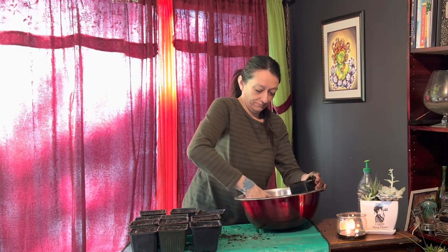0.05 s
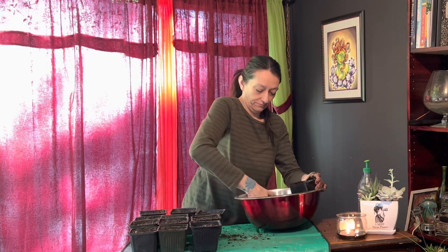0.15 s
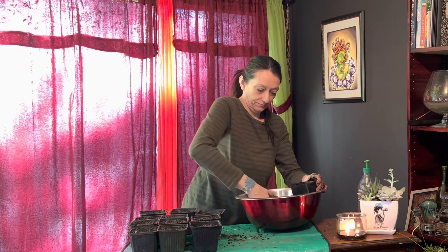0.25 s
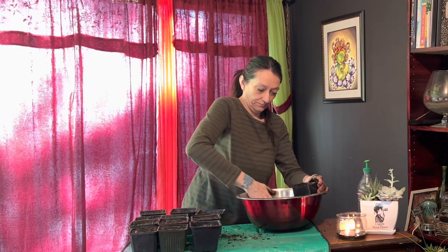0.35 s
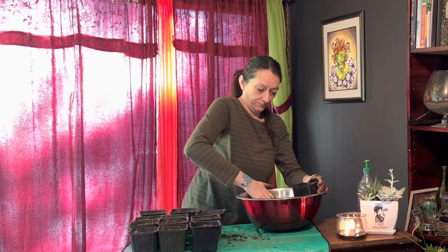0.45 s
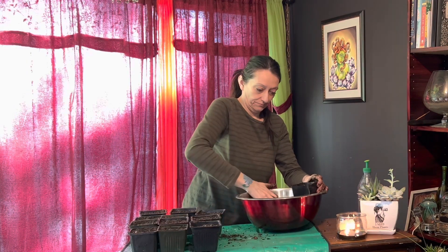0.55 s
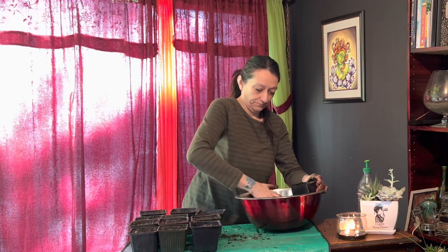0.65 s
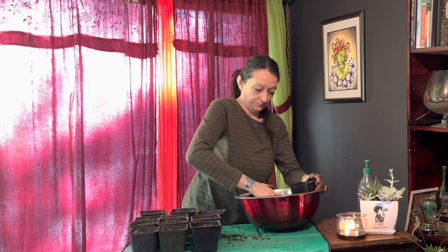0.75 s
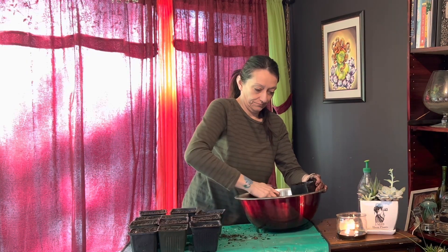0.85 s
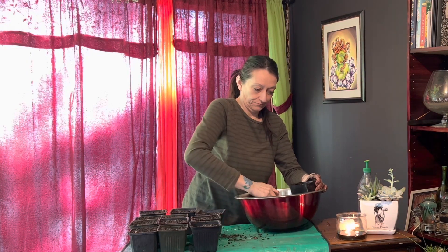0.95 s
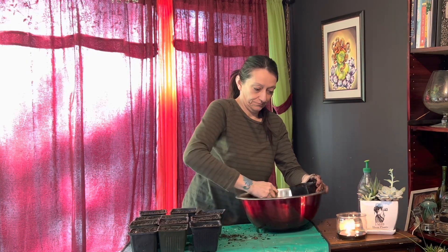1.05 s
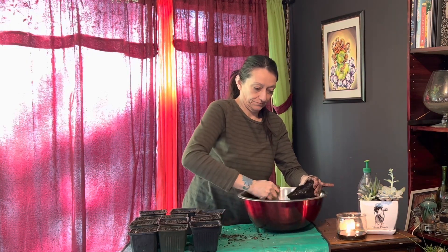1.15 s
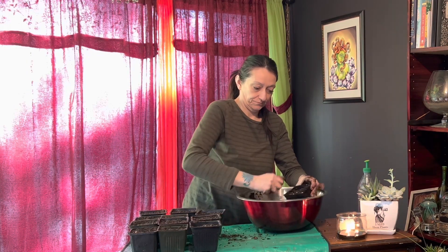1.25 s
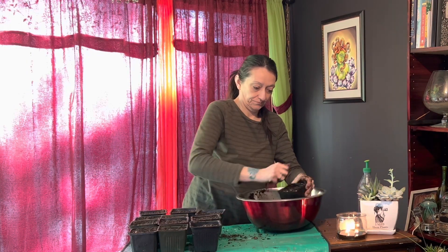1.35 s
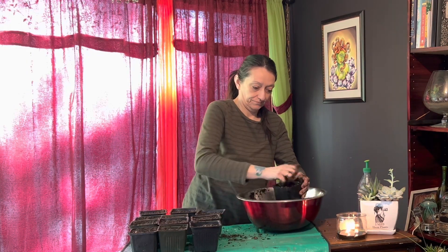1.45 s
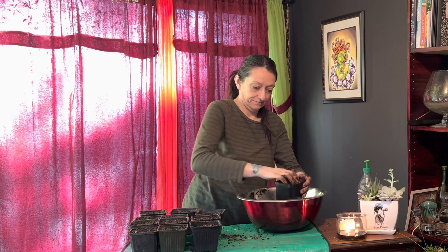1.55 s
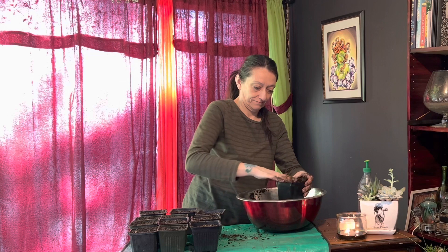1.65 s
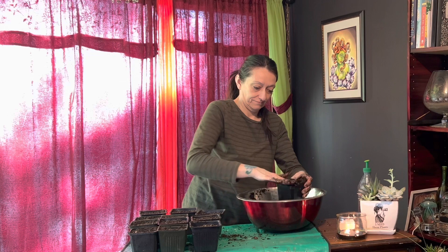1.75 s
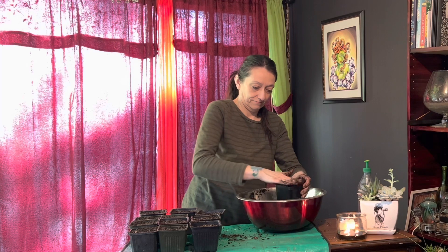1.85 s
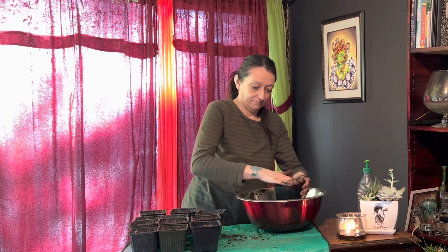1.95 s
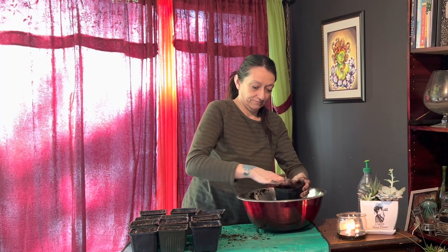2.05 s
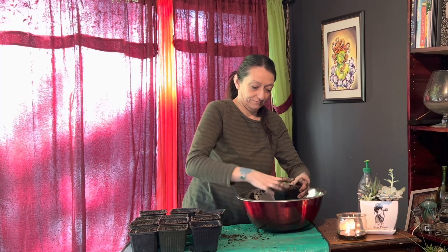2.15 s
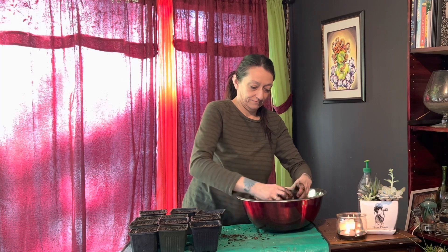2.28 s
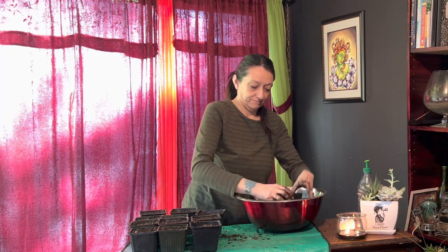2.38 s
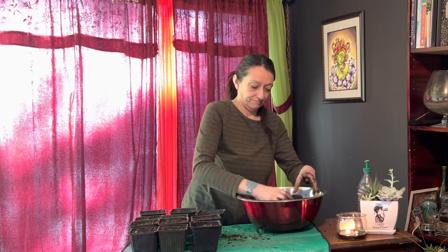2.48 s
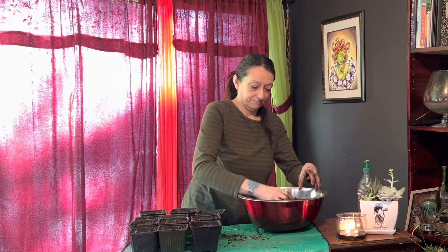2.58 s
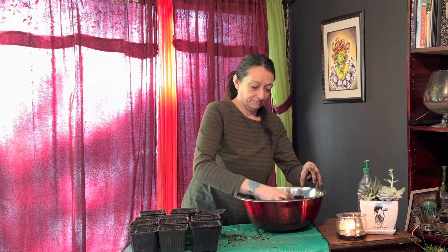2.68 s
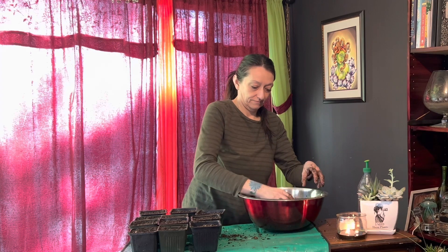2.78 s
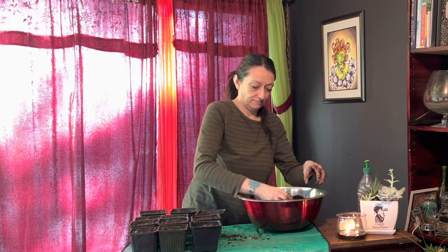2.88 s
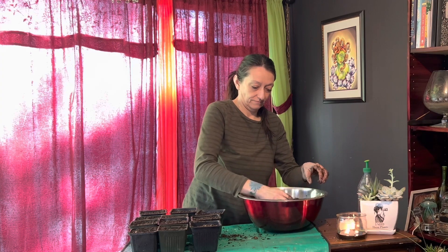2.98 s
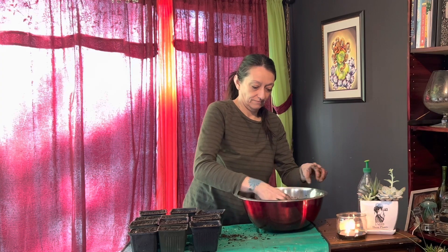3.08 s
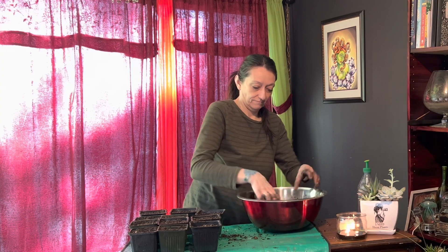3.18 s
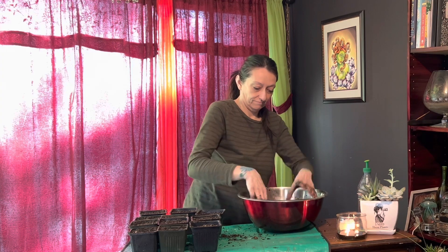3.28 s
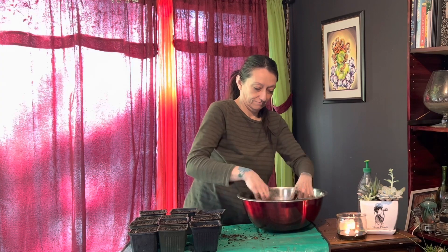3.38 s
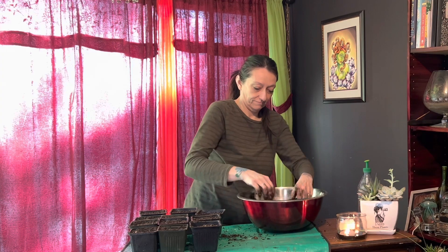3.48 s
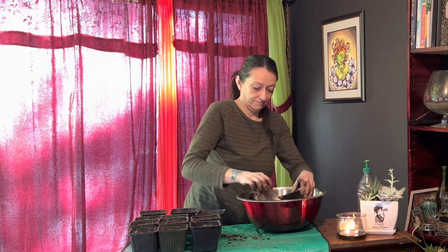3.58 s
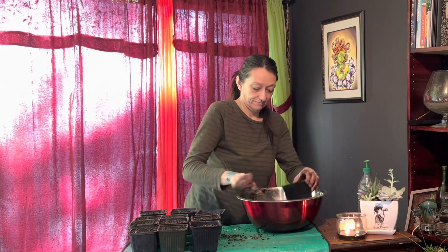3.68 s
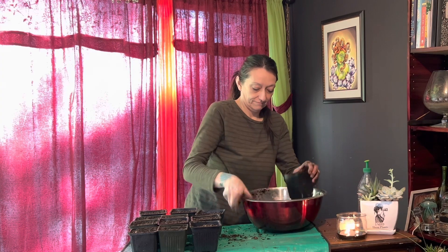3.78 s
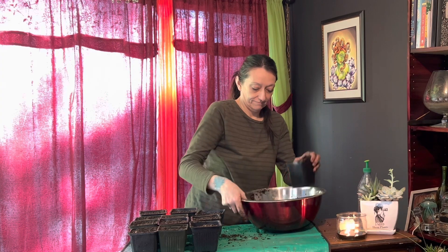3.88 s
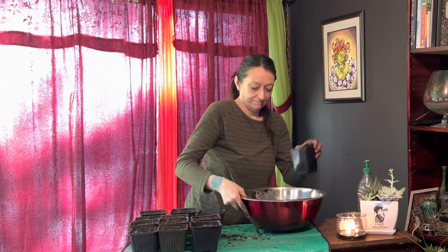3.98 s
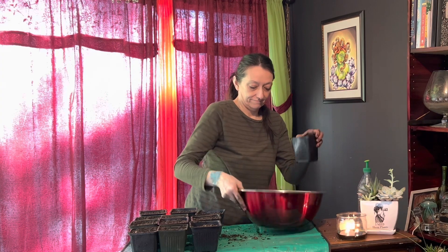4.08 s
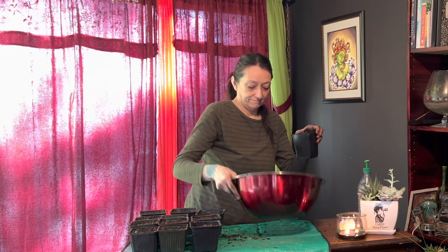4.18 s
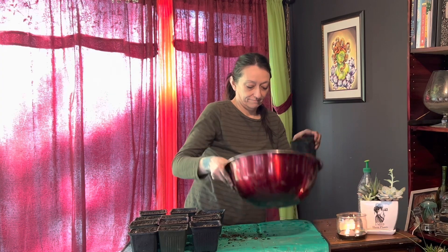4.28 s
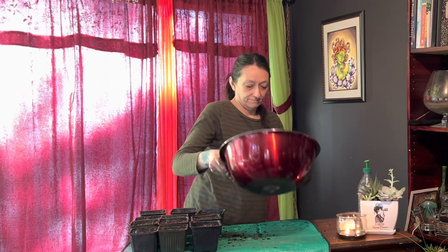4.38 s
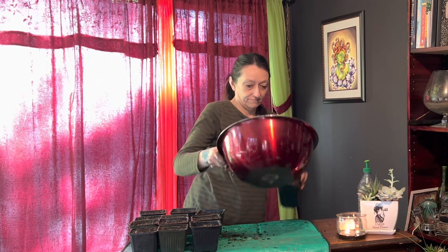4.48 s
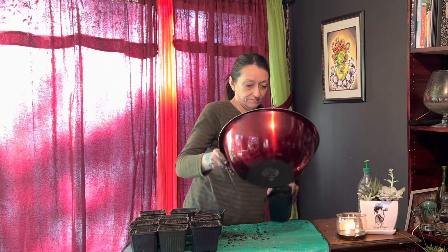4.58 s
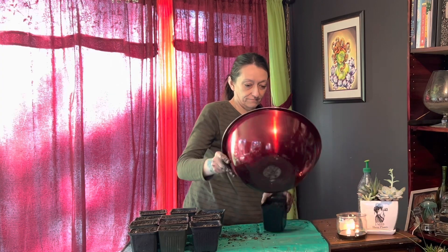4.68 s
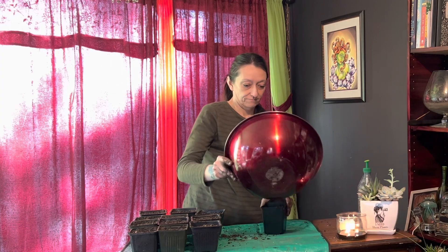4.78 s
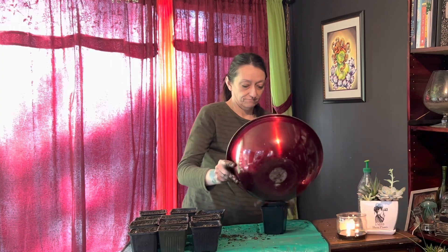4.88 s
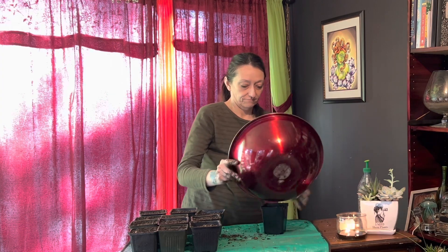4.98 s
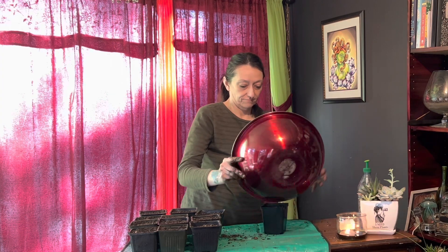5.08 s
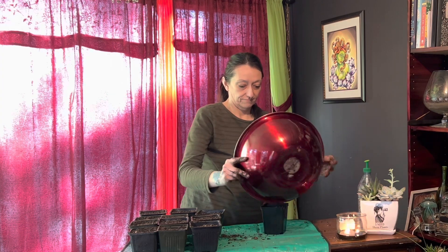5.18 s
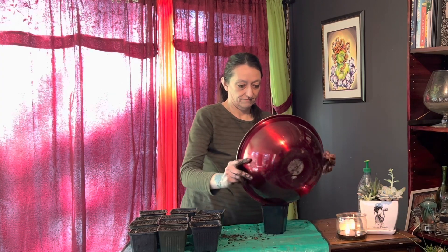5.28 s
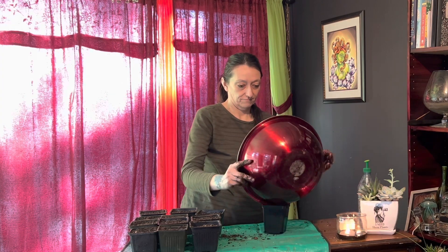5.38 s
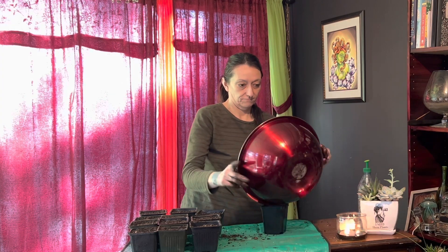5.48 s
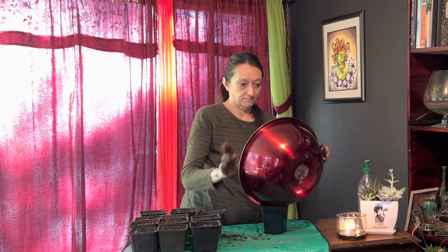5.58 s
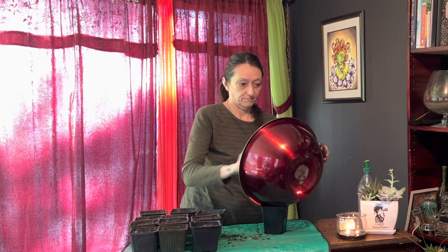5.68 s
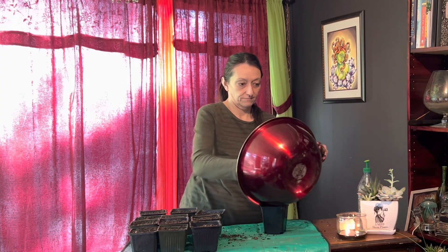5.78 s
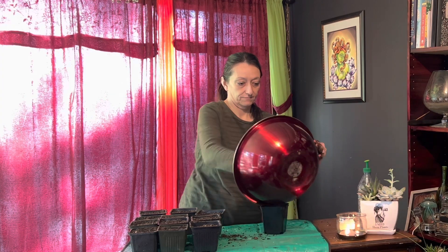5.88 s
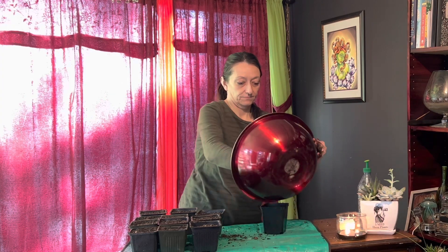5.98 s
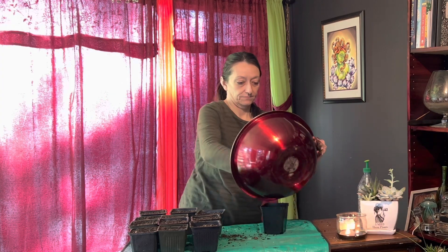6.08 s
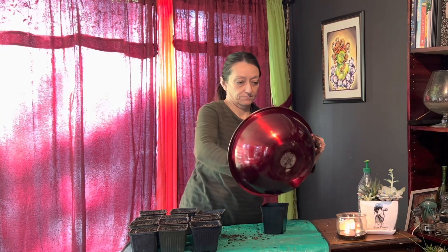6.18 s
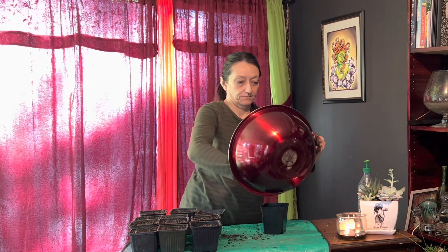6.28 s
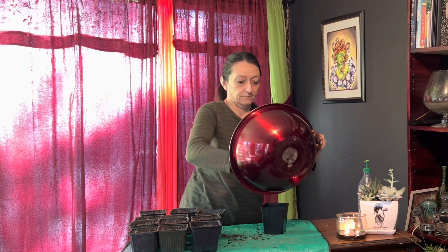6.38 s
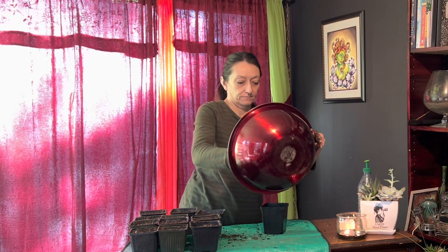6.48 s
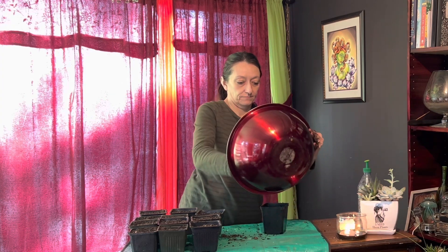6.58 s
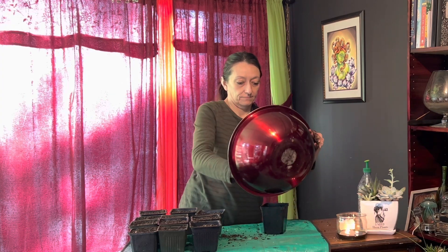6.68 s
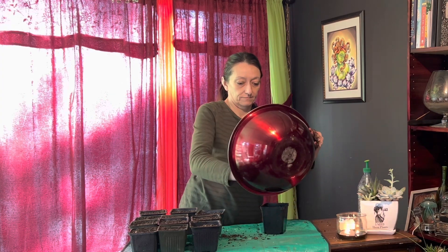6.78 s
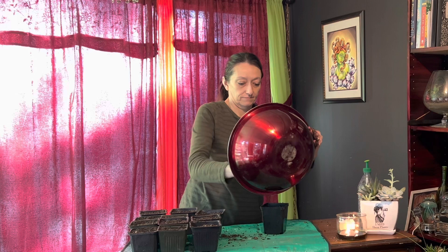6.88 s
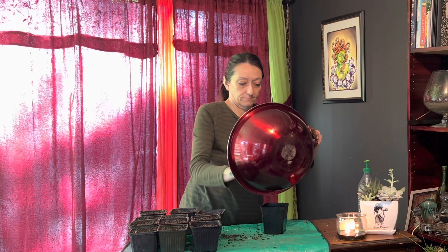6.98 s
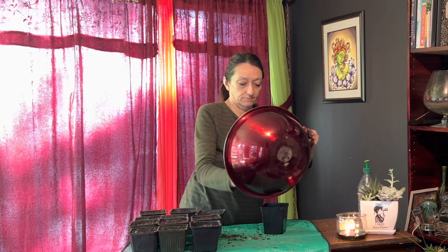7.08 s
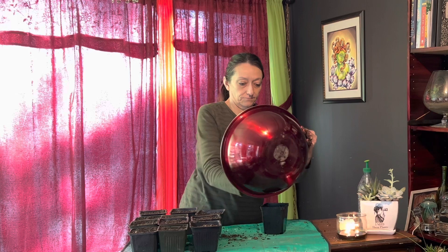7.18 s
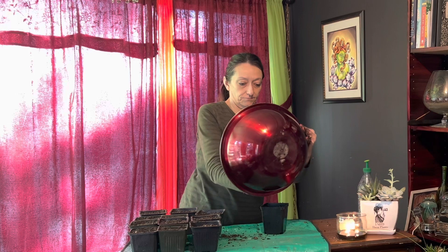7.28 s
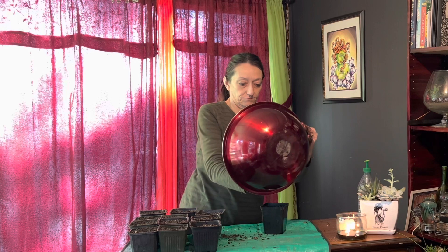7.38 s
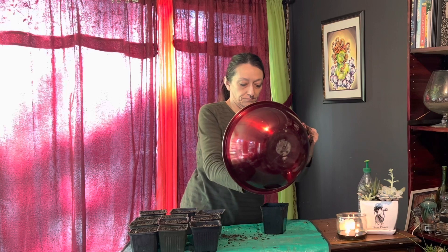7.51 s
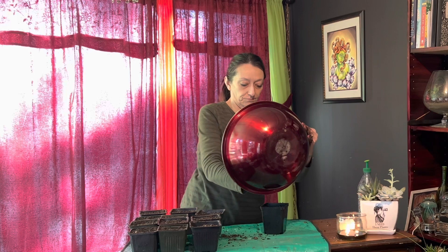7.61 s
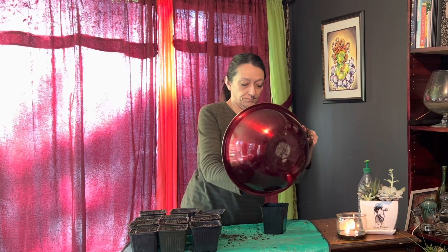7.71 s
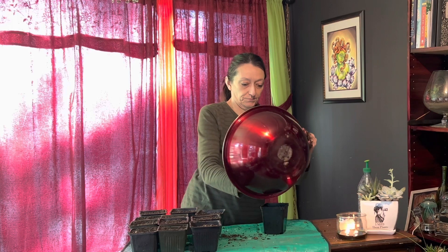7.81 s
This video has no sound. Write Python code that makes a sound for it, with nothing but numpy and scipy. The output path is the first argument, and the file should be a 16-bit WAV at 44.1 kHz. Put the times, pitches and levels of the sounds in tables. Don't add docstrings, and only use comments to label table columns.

```python
import sys
import numpy as np
from scipy import signal
from scipy.fft import rfft, irfft, next_fast_len
from scipy.io import wavfile

SR = 44100
rng = np.random.default_rng(int(sys.argv[2]) if len(sys.argv) > 2 else 0)


def nominal_scale(level):
    x = np.asarray(level, float) / 20
    return 10 ** x


def transcribe(u):
    v = np.clip(np.atleast_2d(u).T, -1, 1)
    q = np.round(v * 32767).astype(np.int16)
    wavfile.write(sys.argv[1], SR, q)


N = 346185
POT_DOWN_S = 4


# (time [s], length [s], grit [dB],
# fine sand over grit [dB], crumbs [dB])
STROKES = [(0.0, 0.029, -59.5, -3, -61), (0.022, 0.33, -55, -3.5, -63.5), (0.32, 0.22, -63.5, -4, -68),
           (0.548, 0.14, -74, -5, -68), (0.659, 0.23, -59.5, -6.5, -62), (0.884, 0.29, -64, -3.5, -57),
           (1.292, .08, -82.5, -7, -88), (1.491, 0.047, -63, -16, -58.5), (1.543, 0.087, -82, 0.5, -62),
           (1.7, 0.14, -80.5, -2, -68.5), (1.824, 0.028, -64, -19, -59.5), (1.858, 0.086, -63, 8.5, -73),
           (2.075, 0.033, -54.5, -27, -74), (2.107, 0.069, -59.5, -3.5, -59), (2.198, .13, -71.5, 3, -59.5),
           (2.358, 0.064, -63, -6.5, -63.5), (2.466, 0.14, -86, -3, -57.5), (2.533, 0.55, -71.5, -3, -62.5),
           (3.2, 0.12, -75, -0.5, -64), (3.385, 0.07, -76, -8, -73), (3.788, 0.087, -61, -6, -55),
           (3.878, 0.15, -59, -2.5, -53), (4.1, .15, -90, -11, -78), (4.243, 0.15, -74, -12, -78),
           (4.298, 0.065, -71.5, -12, -80), (4.473, 0.12, -74, -13, -76), (4.543, 0.06, -74, -13, -78),
           (4.648, 0.031, -64.5, -17, -71), (4.727, 0.09, -65, 4.5, -49), (4.83, 0.056, -72.5, -10, -66.5),
          (4.97, 0.11, -66, -23, -83), (5.077, 0.17, -65.5, -7, -78), (5.254, 0.021, -50, -9, -50),
          (5.343, 0.048, -58.5, -15, -50.5), (5.448, 0.028, -50.5, -12, -47.5),
          (5.536, 0.052, -66.5, -20, -61), (5.695, 0.021, -75.5, -11, -66), (5.791, 0.042, -67, -5.5, -61),
          (5.83, 0.15, -72.5, -9, -86), (5.922, 0.34, -58, -1, -57), (6.27, 0.053, -62.5, -13, -91),
          (6.37, 0.14, -74, -15, -92), (6.473, 0.2, -57, -2, -55.5), (6.686, 0.072, -52.5, -2.5, -61),
          (6.89, 0.019, -73.5, -29, -94), (6.957, 0.036, -60.5, -23, -77), (6.977, 0.6, -58.5, -8, -69.5),
          (7.183, 0.19, -59.5, -3.5, -61.5), (7.44, 0.25, -64, -3.5, -81), (7.685, .14, -61.5, -6.5, -73),
          (7.793, 0.07, -58, -14, -67)]
# (frequency [Hz], density [dB per Hz])
GRIT = [(3900, -7.5), (4400, -4.5), (5000, 7.5), (5700, 4.5), (6600, -3.5)]
# (frequency [Hz], density [dB per Hz])
DUST = [(6500, 0.5), (7500, -15.5), (8600, -4), (9500, -6), (11000, -5), (12200, -29.5), (14000, -15.5),
        (15800, -11.5)]
# (frequency [Hz], density [dB per Hz])
CRUMBS = [(600, 11.5), (900, -0.5), (1200, 6.5), (1700, 7.5), (2400, -5), (3200, 6.5), (4200, -0.5)]


def rubbing():
    s, length, grit_db, sand_db, crumbs_db = np.transpose(STROKES)
    drag, sift, drop = [
        strokes(s, length, db, rise_share=0.22, sag_db_per_s=6, fall_db_per_s=500)
        for db in (grit_db, grit_db + sand_db, crumbs_db)]
    slips = nominal_scale(2.0 * drift(34))
    grit = scatter(grains(5000 * slips, spread_db=3.5), GRIT, cycles=7, patchy_db=2.5, count=9)
    dust = scatter(grains(8000 * slips, spread_db=3.0), DUST, cycles=18, patchy_db=-3.5, count=13)
    falling = grains(3000 * nominal_scale(3.4 * drift(16)), spread_db=3.0)
    crumbs = drop * scatter(falling, CRUMBS, cycles=7, patchy_db=2.5, count=12)
    cavity = nominal_scale(-35.5) * ring(crumbs, hz=1170, t60=0.023)
    hiss = drag * above(grit, hz=4230, order=6) + nominal_scale(3.0) * sift * above(dust, hz=5520)
    return nominal_scale(-2.5) * slips * hiss + nominal_scale(-7.0) * above(crumbs + cavity, hz=556)


# (time [s], rattle [dB], grit spray [dB], clack pitch [Hz], contact length [s])
BOWL_BLOWS = [(1.074, -81, -83, 1210, .01), (1.387, -71, -56.5, 953, 0.003), (1.425, -63, -88, 1010, 0.003),
              (1.515, -65, -77, 910, .011), (1.857, -41, -41, 2470, 0.015), (1.924, -46, -60, 3100, 0.021),
              (2.044, -50, -64.5, 1330, 0.013), (2.08, -42, -50, 1700, 0.0095),
              (2.471, -54, -61, 1160, 0.017), (2.53, -19.5, -30.5, 1505, 0.0054),
              (2.543, -26, -38, 1370, 0.005), (2.669, -68, -54.5, 1230, 0.008),
              (2.724, -27, -35.5, 1860, 0.0078), (2.923, -22.5, -37.5, 1680, .014),
              (2.946, -36, -48.5, 1990, 0.0099), (3.066, -35, -41, 1450, 0.011),
              (3.247, -60.5, -66, 1606, 0.03), (3.391, -62, -70, 1663, 0.0095),
              (3.439, -56.5, -81, 1613, 0.016)]
# (time [s], rattle [dB], table boom [dB], grit spray [dB])
TABLE_BLOWS = [(4.655, -67, -81, -66), (4.716, -38.5, -35.5, -53.5), (4.767, -61, -63, -51),
               (4.988, -74, -82, -63), (5.118, -72, -75, -55.5), (5.257, -53, -43.5, -54),
               (5.359, -50, -50.5, -61), (5.452, -40, -43.5, -49.5), (5.703, -54.5, -59, -73),
               (5.8, -62, -56.5, -55), (5.964, -73, -74, -59), (6.367, -80, -57.5, -51.5),
               (6.5, -64, -66, -62), (6.964, -83, -75, -60), (7.199, -75, -57, -51)]
# (frequency [Hz], density [dB per Hz])
SPRAY = [(700, 8.5), (1200, -20), (1700, 3.5), (2500, 1), (3500, 2.5), (4200, -34), (5100, 2),
         (7000, -10.5), (9000, 1), (12000, -9.5), (15800, -14)]
# (frequency [Hz], level [dB], t60 [s])
RIM = [(1170, -2.5, 0.37), (1280, -3.5, 0.072), (1663, 3, 0.29), (1640, 0.5, 0.36), (1965, 2.5, 0.12),
       (1930, -4.5, 0.15), (2393, -9.5, 0.16), (3110, -9, .15), (4220, -4, 0.29), (4730, -6, 0.17),
       (5600, 4, 0.04)]
# (frequency [Hz], level [dB], t60 [s])
BODY = [(203.5, -12, 0.16), (265, -19, 0.11), (375, 3.5, 0.1), (423.6, 2, 0.11), (501, 2, 0.089),
        (600, 1, 0.084), (670, -10, 0.14), (725, -7, 0.088), (835, 1, 0.1)]
# (frequency [Hz], level [dB], t60 [s])
TABLE = [(202, -19, 0.18), (268.5, -3.5, 0.087), (368, -1, 0.099), (485, 0, 0.092), (638, 0.5, 0.049),
         (677, -1.5, 0.092), (816, 3, 0.018), (1150, -4.5, 0.053), (1400, -7, 0.042)]
BOOM_DB, BOOM_PER_RATTLE, HARD_BLOW_DB = -35.5, 1.87, -24


def knocks():
    nudge_hz, nudge_s = 1120, 0.005
    bowl_rows = [
        (s, db, BOOM_DB + BOOM_PER_RATTLE * min(db - HARD_BLOW_DB, 0), spray, hz, length)
        for s, db, spray, hz, length in BOWL_BLOWS]
    table_rows = [(*row, nudge_hz, nudge_s) for row in TABLE_BLOWS]
    s, rattle_db, body_db, spray_db, pitch_hz, length = np.transpose(bowl_rows + table_rows)
    rattle, spray = [bursts(s, db, length, rise_s=0.0013) for db in (rattle_db, spray_db)]

    low_spray = [p for p in SPRAY if p[0] < 4000]
    high_spray = [p for p in SPRAY if p[0] > 4000]
    broad = scatter(grains(20000, spread_db=1.0) * rattle, low_spray, cycles=8.2, patchy_db=3.5, count=12)
    fine = scatter(grains(33000, spread_db=-12.0) * spray, high_spray, cycles=17.4, patchy_db=4, count=16)

    on_table = np.arange(N) > POT_DOWN_S * SR
    rim = nominal_scale(-35.0) * struck(rattle * ~on_table, RIM, shorten=0.17, per_s=1300)
    plastic = clacks(s, rattle_db - 23.0, pitch_hz, length, cycles=21.0, rise_s=0.0024)
    in_bowl, at_table = s < POT_DOWN_S, s > POT_DOWN_S
    bowl = nominal_scale(3.0) * boomed(s[in_bowl], body_db[in_bowl], BODY)
    table = nominal_scale(1.5) * boomed(s[at_table], body_db[at_table], TABLE)

    clatter = above(nominal_scale(-5.5) * broad + rim + plastic, hz=630)
    return clatter + nominal_scale(5.5) * above(fine, hz=4070, order=8) + above(bowl + table, hz=168.5)


# (time [s], level [dB], pitch [Hz], rub length [s])
POT = [
    (3.79, -57, 1144, 0.026),
    (4.652, -58, 3260, 0.0093),
    (5.456, -41.5, 1140, 0.0053),
    (5.542, -54, 1136, 0.019),
]
# (time [s], level [dB], pitch [Hz], length [s])
LUMPS = [(1.387, -53, 6090, 0.012), (1.39, -70, 5100, 0.0066), (2.08, -49.5, 4730, 0.018),
         (2.529, -31.5, 4580, 0.013), (2.538, -38, 5250, 0.0092), (2.53, -33, 3830, .012),
         (2.533, -35.5, 3050, .016), (2.725, -48, 15000, .025), (1.5, -63, 3000, 0.022),
         (2.919, -41, 4830, .012), (2.927, -43, 2850, 0.013), (2.94, -45.5, 6830, 0.021),
         (3.88, -56, 2940, 0.011), (3.911, -55, 4200, .008), (3.96, -54.5, 5150, 0.012),
         (3.99, -56, 3980, 0.019), (4.002, -58, 5300, 0.012), (4.788, -54, 2770, 0.011),
         (4.79, -56.5, 4760, 0.012), (2.104, -54, 2700, 0.016), (4.315, -67, 5100, 0.014),
         (4.574, -65, 4950, .015), (4.987, -55, 6000, 0.016), (5.05, -58, 5230, 0.011),
         (5.118, -54, 5100, 0.0092), (5.121, -60, 7000, .008), (5.164, -58.5, 5430, 0.014),
         (5.27, -49, 4800, .012), (6.376, -53.5, 6040, 0.011), (6.727, -58, 5300, .015),
         (6.965, -57, 5070, 0.014), (7.191, -49, 6700, 0.016), (7.818, -58, 5130, 0.011)]


def pot_and_lumps():
    s, db, hz, length = np.transpose(POT + LUMPS)
    cycles = [34] * len(POT) + [18] * len(LUMPS)
    return clacks(s, db - 10, hz, length, cycles, rise_s=.004)


# (time [s], level [dB],
# pitch [Hz], t60 [s])
PINGS = [(1.058, -53, 1150, .06), (1.08, -47, 1115, .05), (1.431, -47.5, 851, 0.023),
         (1.431, -49.5, 1230, 0.017), (3.814, -43, 1134, 0.2), (3.822, -49, 1170, .12),
         (3.815, -52, 4920, 0.1), (3.83, -56, 5100, .06), (5.458, -52, 1140, 0.14),
         (5.47, -47.5, 1150, .08), (5.552, -57, 1130, .1), (5.575, -55, 1135, .08),
         (1.862, -41, 2460, 0.095), (1.92, -49, 3010, .1), (2.533, -35, 587, .09), (2.536, -35, 502, 0.12),
         (2.544, -34, 1390, .06), (2.926, -38, 1138, .15), (2.925, -36, 431, .14), (2.926, -33, 1594, .07),
         (2.926, -40, 1420, .1), (2.726, -45, 600, .07), (3.07, -51, 390, .16), (3.07, -38, 1150, 0.055),
         (5.258, -53, 520, 0.065), (5.258, -52, 990, .05), (5.259, -49, 1450, .04),
         (5.455, -47, 483, 0.062), (4.718, -43, 270, 0.075), (4.719, -35, 495, 0.12),
         (4.718, -43, 830, .06), (4.718, -47, 1075, .07), (4.718, -49, 1430, .05), (5.553, -51, 810, 0.078)]
# (time [s], level [dB], pitch [Hz], t60 [s])
RINGS = [(2.532, -37, 1300, .08), (2.538, -38, 1350, .07), (2.54, -41.5, 1233, .15),
         (2.536, -38, 2390, .12), (2.532, -38, 670, 0.067), (2.534, -42, 382, 0.17),
         (2.545, -41, 920, 0.18), (2.725, -42, 1970, 0.063), (2.738, -42.5, 1500, 0.119),
         (2.726, -46, 550, 0.16), (2.926, -38, 409, 0.2), (2.926, -38, 372, 0.16), (3.07, -52, 360, 0.13),
         (2.5, -52, 5000, 0.026), (2.925, -29, 814, 0.067), (2.935, -41.5, 1141, 0.17),
         (2.925, -37.5, 1405, .12), (2.925, -33.5, 1653, 0.13), (2.935, -35, 2000, .08),
         (2.925, -39, 2700, .1), (2.925, -44, 2826, .1), (2.925, -43, 1900, .08), (3.07, -47, 1400, 0.072),
         (3.085, -49.5, 760, .1)]
# (time [s], level [dB], pitch [Hz], t60 [s])
CRACKS = [
    (2.536, -13, 3000, .0012),
    (2.9245, -13, 2200, .0018),
]


def pings(rows):
    out = np.zeros(N)
    for s, db, hz, t60 in rows:
        t = np.arange(int(t60 * SR) + 2) / SR
        rise = 1 - np.exp(-t / (0.014 * t60))
        start = int(s * SR)
        out[start:start + len(t)] += nominal_scale(db - 60 * t / t60) * rise * np.sin(2 * np.pi * hz * t)
    return out


# (time [s], level [dB])
THUDS = [
    (2.575, -32.5),
    (2.767, -32.5),
    (2.967, -30.5),
    (4.76, -43),
]


def thuds():
    s, db = np.transpose(THUDS)
    push = bursts(s, db - 39.5, np.full(len(s), .003), rise_s=0.00057)
    return above(ring(push, hz=64.7, t60=0.24), hz=42.4, order=2)


# (time [s], level [dB])
MOTOR = [(0.0, -78), (1.27, -74.5), (1.84, -59.5), (2.03, -59.5), (2.45, -65), (3.15, -60), (3.6, -53.5),
         (4.29, -52.5), (5.0, -55), (7.85, -52.5)]
# (multiple of motor pitch [1], level [dB])
MOTOR_REST = [(3, -78), (5, -86.5), (6, -83)]
# (time [s], length [s], multiple of motor pitch [1], level [dB])
BUZZES = [(0.25, 0.81, 2, -66), (1.8, 0.4, 2, -69.5), (2.4, 2.1, 2, -74.5), (3.294, 0.71, 2, -65.5),
          (4.418, 1.06, 2, -64), (5.896, 2.6, 2, -66.5), (0.0, 2, 4, -77.5), (3.5, 0.71, 4, -72.5),
          (5.58, 1.33, 4, -69), (5.5, 0.41, 4, -67.5), (6.9, 0.64, 4, -64), (6, 0.72, 3, -68),
          (7, 1.04, 3, -67), (6.0, 0.46, 6, -71), (7.4, .5, 6, -73)]
# (frequency [Hz], level [dB])
MAINS = [(59.2, -63), (119.9, -70)]


def hum():
    t = np.arange(N) / SR
    load_db = np.interp(t, *np.transpose(MOTOR))
    s, length, multiple, buzz_db = np.transpose(BUZZES)
    orders = [(1, nominal_scale(load_db))]
    for k in np.unique(multiple):
        same = multiple == k
        gain = strokes(s[same], length[same], buzz_db[same],
                       rise_share=0.36, sag_db_per_s=0, fall_db_per_s=50)
        orders.append((k, gain))
    orders += [(k, nominal_scale(db + 4.0 * drift(.8))) for k, db in MOTOR_REST]
    motor_hz = 81 + 0.1513 * drift(1.73)
    turn = 2 * np.pi * np.cumsum(motor_hz) / SR
    motor = sum(gain * np.sin(k * turn + rng.uniform(0, 5.84)) for k, gain in orders)
    mains = sum(nominal_scale(db + 2.4 * drift(0.87)) * np.sin(2 * np.pi * f * t + 0.36 * drift(0.36))
                for f, db in MAINS)
    return np.sqrt(2) * (motor + mains) * nominal_scale(np.array([[1.1], [-1.1]]))


# (frequency [Hz], level [dB])
AIR = [(12, -8), (20, -15.5), (66, -1), (100, -7.5), (164, -11), (249, -7.5), (421, -13.5), (571, -10),
       (733, -19.5), (1270, -21), (2770, -39), (5090, -44.5), (8860, -44.5), (10200, -90.5), (11400, -47),
       (15000, -87.5)]
# (frequency [Hz], correlation [1])
LIKENESS = [(40, 0.74), (125, 0.37), (300, 0.42), (620, 0.4), (1050, 0.46), (1700, .2), (2600, .03),
            (5000, 0.028)]
# (frequency [Hz], lead of the left [rad])
AIR_PHASE = [(300, 0), (620, -2.0), (1050, -3), (1700, -0.5), (2600, .1)]


def air():
    hz = np.fft.rfftfreq(N, 1 / SR)
    sides = np.array([[1], [-1]])
    mid, side = rfft(rng.standard_normal((2, N))) * nominal_scale(at_hz(AIR, hz))
    alike = np.clip(at_hz(LIKENESS, hz), 0, 1)
    both = np.sqrt(1 + alike) * mid + np.sqrt(1 - alike) * side * sides
    both = both * np.exp(.5j * sides * at_hz(AIR_PHASE, hz))
    level = nominal_scale(-60 + .5 * drift(0.39))
    return level * rms_one(irfft(both, N)) * nominal_scale(1.2 * sides)


# (frequency [Hz], t60 [s])
ROOM = [(150, 0.26), (500, 0.2), (2000, 0.27), (6000, 0.17), (14000, 0.063)]
# (frequency [Hz], level [dB])
WET = [(150, 4), (1000, 0.5), (4000, -1), (8000, 0.5), (14000, -8.5)]
# (frequency [Hz], shared part [1])
ECHO_ALIKE = [(150, .6), (350, 0.29), (700, .01)]
# (frequency [Hz], left over right [dB])
PORTS = [(200, 1.5), (500, 3.5), (1000, 4.5), (2200, 3.5), (3500, 3), (4800, 10.5), (6200, 9.5),
         (7500, 7.5), (9500, 1)]


def room(far, close):
    t = np.arange(SR // 2) / SR
    tails = 0
    for low in 100 * 2. ** np.arange(8):
        band = signal.butter(2, [low, min(2 * low, .45 * SR)], "band", fs=SR, output="sos")
        t60 = at_hz(ROOM, 0.93 * low)
        noise = signal.sosfilt(band, rng.standard_normal((2, 2, len(t))))
        tails = tails + noise * nominal_scale(-60 * t / t60) / np.sqrt(t60)
    tails = tails * (1 - np.exp(-(t / 0.0035) ** 2))
    tails = nominal_scale(2.0) * tails / np.sqrt(np.sum(tails ** 2, axis=-1, keepdims=True))
    near = rng.standard_normal((2, 2, len(t))) * nominal_scale(-60 * t / 0.013)
    tails = tails + nominal_scale(-2) * near / np.sqrt(np.sum(near ** 2, axis=-1, keepdims=True))

    x = far + nominal_scale(-6) * close
    size = next_fast_len(N + len(t))
    hz = np.fft.rfftfreq(size, 1 / SR)
    place = 2 * np.pi * 4 * np.arange(N) / SR
    wet = rfft(x * np.cos(place), size) * rfft(tails[0], size)
    wet = wet + rfft(x * np.sin(place), size) * rfft(tails[1], size)
    alike = np.clip(at_hz(ECHO_ALIKE, hz), 0, 1)
    wet = (1 - alike) * wet + alike * wet[0]
    wet = wet * nominal_scale(at_hz(WET, hz))

    direct = rfft(close, size) + rfft(far, size) * nominal_scale(-4)
    late_s = np.array([[0], [7e-5]])
    colour = nominal_scale(np.array([[.5], [-.5]]) * at_hz(PORTS, hz))
    ports = colour * np.exp(-2j * np.pi * hz * late_s)
    return irfft((direct + wet) * ports, size)[:, :N] * nominal_scale(-3.0)


def strokes(starts, lengths, levels_db, rise_share, sag_db_per_s, fall_db_per_s):
    hop = 16
    power = np.zeros(N // hop + 1)
    for s, length, db in zip(starts, lengths, levels_db):
        t = np.arange(len(power)) * hop / SR - s
        swell = np.clip(t / (rise_share * length), 0, 1) ** 2
        held_db = db - sag_db_per_s * t - fall_db_per_s * np.maximum(t - length, 0)
        power += swell ** 2 * nominal_scale(2 * held_db.clip(-200, 0))
    return np.interp(np.arange(N) / hop, np.arange(len(power)), np.sqrt(power))


def bursts(starts, levels_db, lengths, rise_s):
    out = np.zeros(N)
    for s, db, length in zip(starts, levels_db, lengths):
        start, fall_s = int(s * SR), max(length, .002)
        t = np.arange(min(int(8 * fall_s * SR), N - start)) / SR
        out[start:start + len(t)] += nominal_scale(db) * (1 - np.exp(-t / rise_s)) * np.exp(-t / fall_s)
    return out


def struck(envelope, modes, shorten, per_s):
    contacts = grains(per_s, spread_db=-1.0)
    return sum(nominal_scale(db) * ring(envelope * np.roll(contacts, rng.integers(N)), hz, shorten * t60)
               for hz, db, t60 in modes)


def clacks(starts, levels_db, pitches_hz, lengths, cycles, rise_s):
    out, rough = np.zeros(N), grains(5400, spread_db=4.0)
    cycles = np.broadcast_to(cycles, len(starts))
    for s, db, hz, length, turns in zip(starts, levels_db, pitches_hz, lengths, cycles):
        here = slice(int(s * SR), int((s + .25) * SR))
        contact = (rough * bursts([s], [db], [length], rise_s))[here]
        out[here] += above(ring(contact, hz, turns / hz), hz=0.78 * hz) * np.sqrt(hz / 1000)
    return out


def boomed(starts, levels_db, modes):
    push = bursts(starts, levels_db, np.zeros(len(starts)), rise_s=0.00045)
    push = np.diff(push, prepend=0)
    return sum((-1) ** k * nominal_scale(db) * ring(push, hz, t60) for k, (hz, db, t60) in enumerate(modes))


def scatter(clicks, spectrum, cycles, patchy_db, count):
    pitches = np.geomspace(spectrum[0][0], spectrum[-1][0], count)
    dealt = rng.integers(0, count, N)
    power = nominal_scale(2 * at_hz(spectrum, pitches)) * pitches
    share = power / power.sum()
    heights = np.sqrt(share * count * 4 * np.log(1000) * pitches / (cycles * SR))
    out = np.zeros(N)
    for k, (hz, height) in enumerate(zip(pitches, heights)):
        flicker = nominal_scale(patchy_db * drift(12.0))
        out += height * flicker * ring(clicks * (dealt == k), hz, cycles / hz)
    return out


def grains(per_s, spread_db):
    sizes = nominal_scale(spread_db * np.minimum(rng.exponential(1, N), 5)) * rng.choice([-1, 1], N)
    return rms_one(sizes * (rng.random(N) < per_s / SR))


def ring(x, hz, t60):
    r, w = nominal_scale(-60 / (t60 * SR)), 2 * np.pi * hz / SR
    return signal.lfilter([0, np.sin(w)], [1, -2 * r * np.cos(w), r * r], x + 1e-18)


def drift(rate):
    r = np.exp(-80 * np.pi * rate / SR)
    noise = rng.standard_normal(N // 40 + 2002)
    slow = signal.lfilter([1], [1, -2 * r, r * r], noise)[2000:]
    return np.interp(np.arange(N) / 40, np.arange(len(slow)), rms_one(slow))


def above(x, hz, order=4):
    return signal.sosfilt(signal.butter(order, hz, "high", fs=SR, output="sos"), x)


def at_hz(points, hz):
    points = np.array(points)
    return np.interp(np.log(hz + 1), np.log(points[:, 0]), points[:, 1])


def rms_one(x):
    return x / np.sqrt(np.mean(x ** 2) + 1e-20)


def scene():
    far = rubbing() + knocks() + pot_and_lumps() + pings(RINGS)
    close = pings(PINGS + CRACKS)
    return room(far, close) + thuds() + hum() + air()


def roll_off(x):
    return signal.sosfilt(signal.butter(12, 17120, fs=SR, output="sos"), x)


# (from frequency [Hz], chance in phase [1], chance empty [1])
JOINED = [(9600, .01, 0), (10350, .08, 0), (10700, .72, .03), (11350, .97, .1), (12000, .98, .4),
          (12500, .75, .6), (13100, .02, .4), (13800, .01, .1), (14500, .65, .15), (15150, .99, .2),
          (15800, 1, 1)]


def record(dry):
    hz, frames, (left, right) = signal.stft(dry, SR, nperseg=512)
    edges, in_phase, empty = np.transpose(JOINED)
    luck = rng.random((2, len(edges), len(frames) // 4 + 1))
    luck = np.repeat(luck, 4, axis=-1)[..., :len(frames)]
    band = np.searchsorted(edges, hz) - 1
    treble = hz[:, None] > edges[0]
    kept = (luck[0] > empty[:, None])[band]
    sign = np.where(luck[1] < in_phase[:, None], 1, -1)[band]
    left = np.where(treble, nominal_scale(-0.5) * left * kept, left)
    right = np.where(treble, left * sign, right)

    starved = rng.random((len(hz) // 2 + 1, len(frames) // 12 + 1)) < .06
    starved = np.kron(starved, np.ones((2, 12)))[:len(hz), :len(frames)]
    starved = starved * ((hz > 1750) & (hz < 3700))[:, None]
    both = np.array([left, right]) * nominal_scale(-40 * starved)
    mix = signal.istft(both, SR, nperseg=512)[1][:, :N]
    return roll_off(mix)


dry = scene()
out = record(dry)
transcribe(out)
```